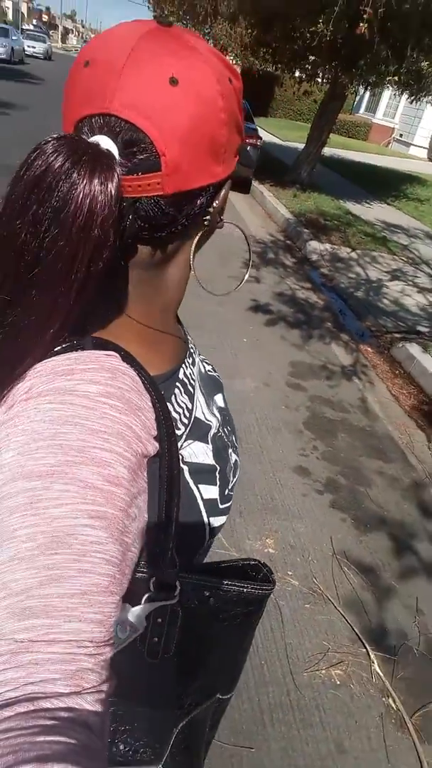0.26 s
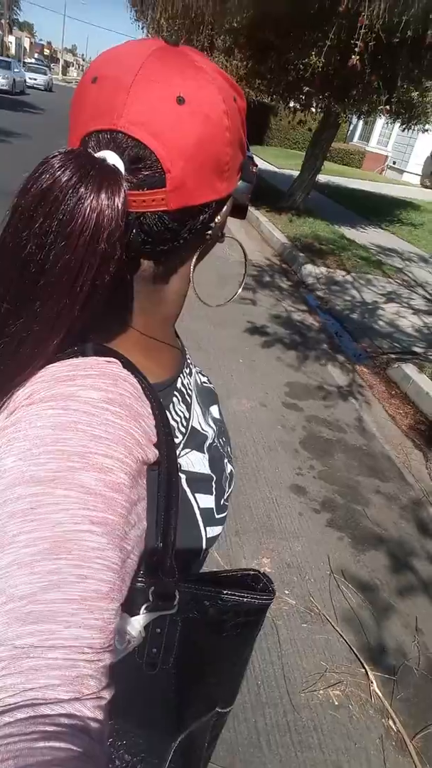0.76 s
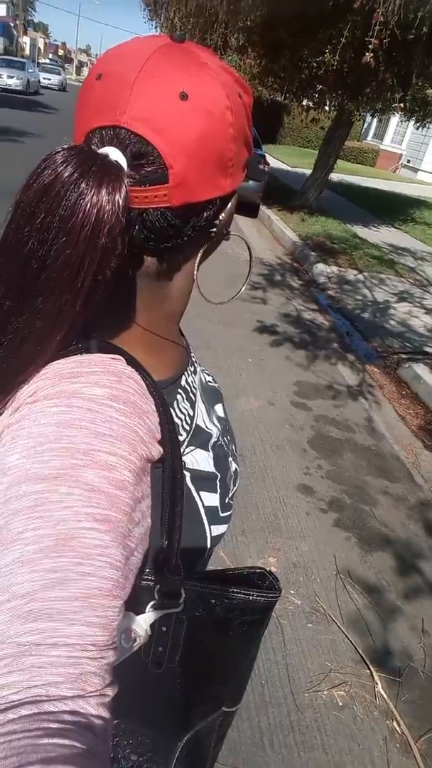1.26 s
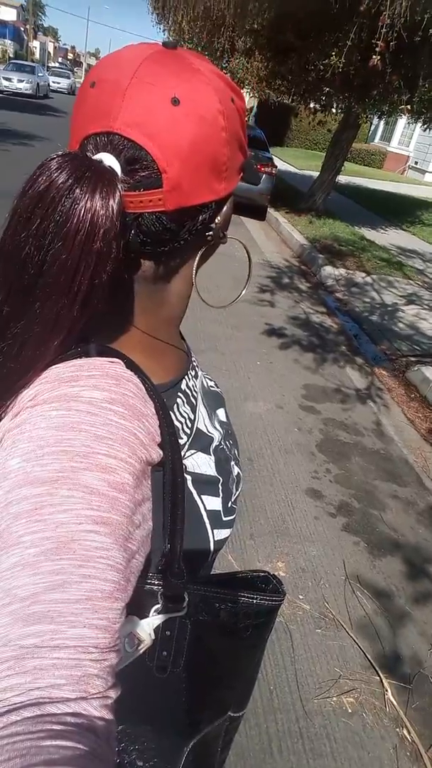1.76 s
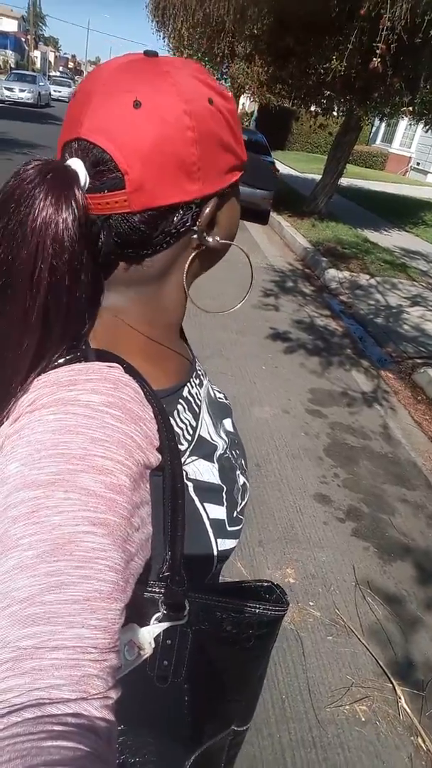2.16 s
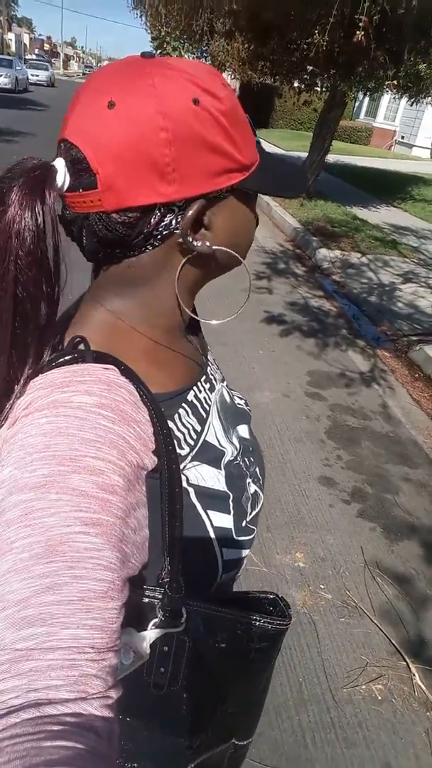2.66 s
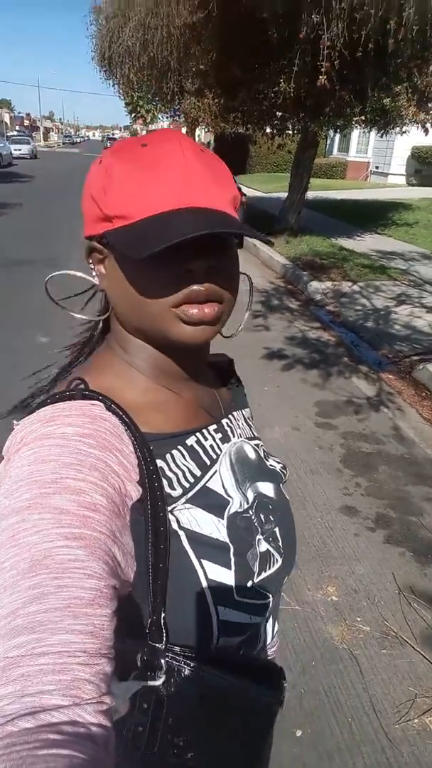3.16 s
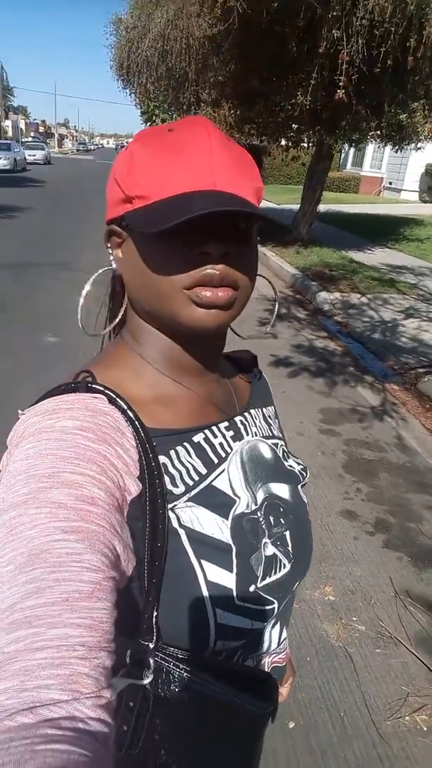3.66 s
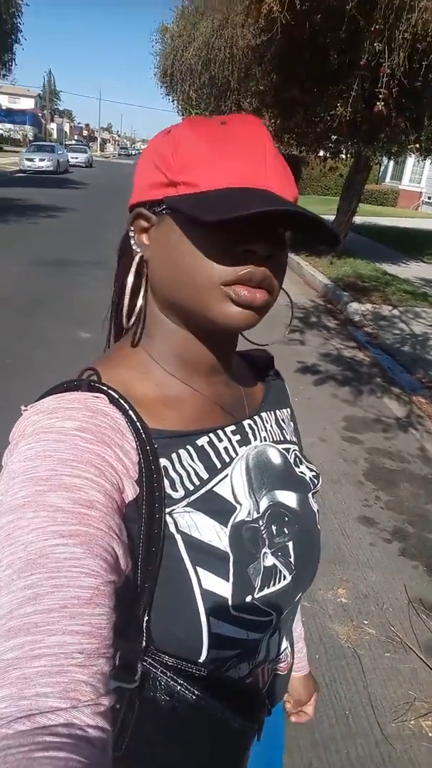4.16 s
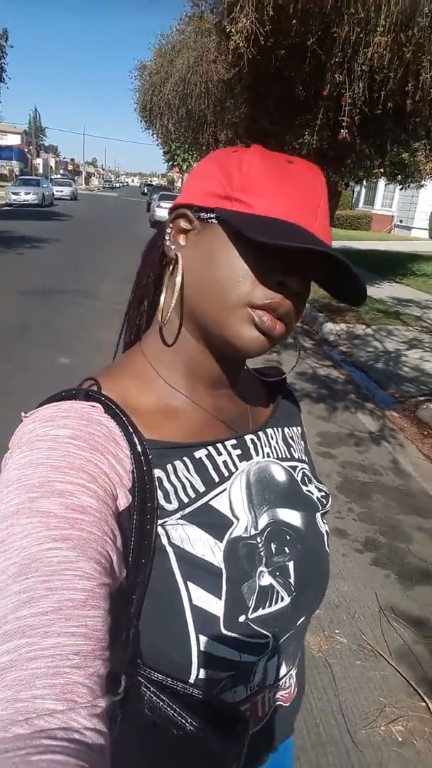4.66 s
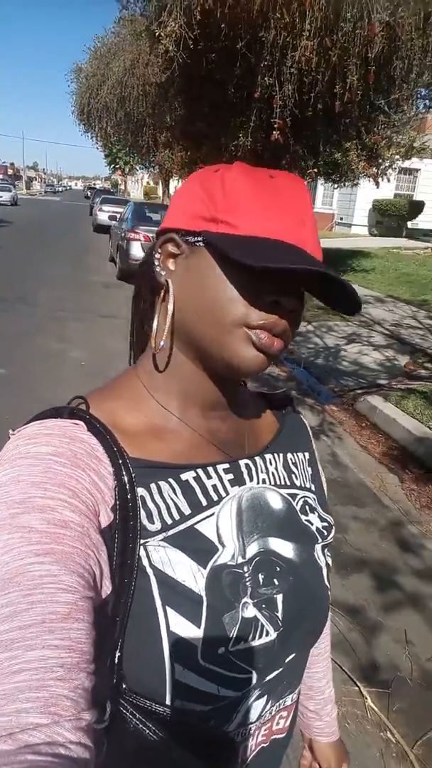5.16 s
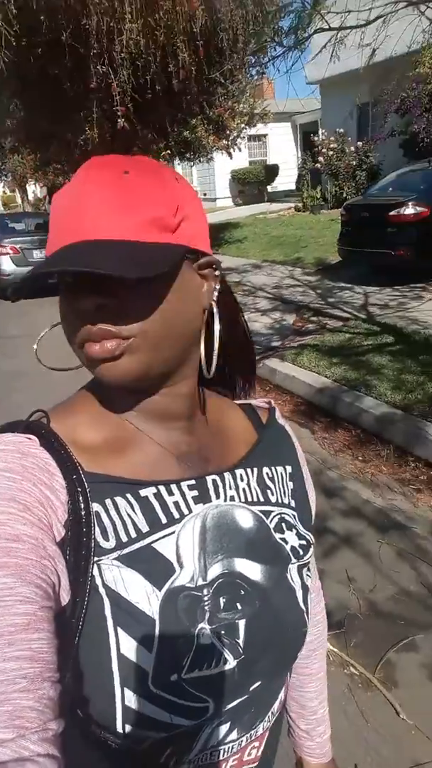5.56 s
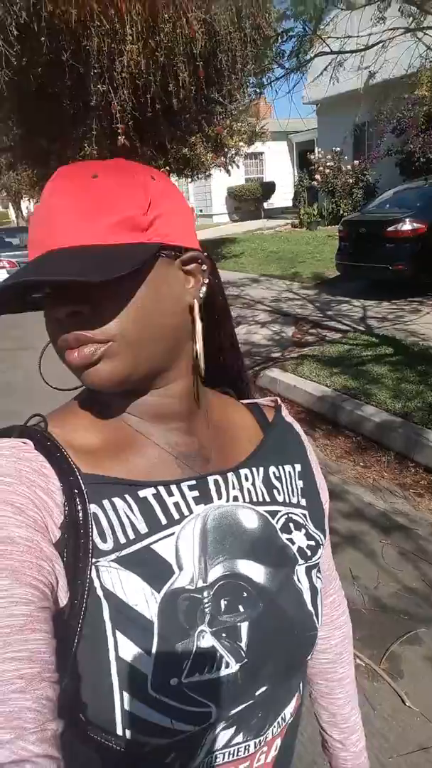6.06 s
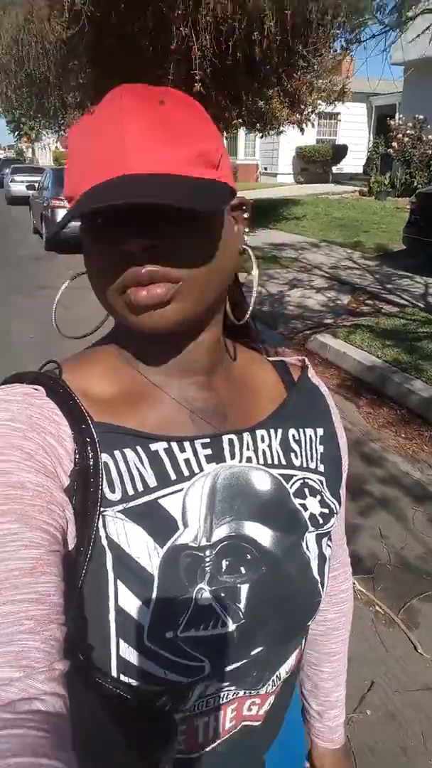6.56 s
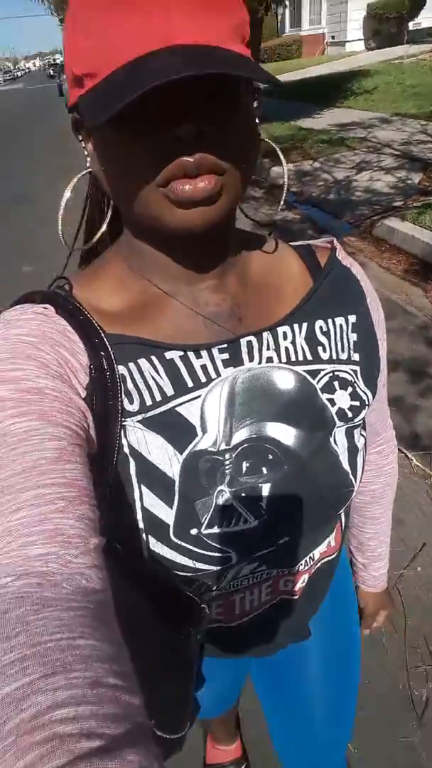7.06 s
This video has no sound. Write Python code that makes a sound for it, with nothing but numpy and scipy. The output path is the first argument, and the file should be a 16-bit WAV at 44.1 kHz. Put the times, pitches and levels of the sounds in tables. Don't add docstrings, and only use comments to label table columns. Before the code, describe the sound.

Sparrows whistle and buzz on a quiet street with faint distant sirens and traffic hum; a car door slams, then gritty footsteps and handling knocks.

```python
import sys
import numpy as np
from scipy import signal
from scipy.fft import rfft, irfft, next_fast_len
from scipy.io import wavfile
from scipy.ndimage import uniform_filter1d, map_coordinates

SR = 44100
rng = np.random.default_rng(int(sys.argv[2]) if len(sys.argv) > 2 else 0)


def gain_from_decibels(decibels):
    exponent = np.asarray(decibels, float) / 20
    return 10 ** exponent


def dump_mix(stems):
    frames = np.atleast_2d(stems).T
    limited = np.clip(frames, -1, 1)
    pcm = np.round(limited * 32767).astype(np.int16)
    wavfile.write(sys.argv[1], SR, pcm)


N = 322812

# time in seconds, level in dB.
HUM = [(0, -46), (3.5, -46), (4.8, -48), (5.4, -51), (6.9, -54.5), (7.32, -58)]
# time in seconds, depth in dB.
HUM_DIPS = [
    (.72, 2),
    (1.669, 6.1),
    (4.939, 9.5),
]
# time in seconds, level in dB.
TRAFFIC = [(0, -56.5), (.35, -56), (.98, -51), (1.88, -56), (2.2, -54.5), (3.55, -54), (4.7, -53),
           (5.26, -50), (5.69, -54), (5.87, -51.5), (6.26, -54.5), (6.74, -51.5), (7.32, -55)]
# frequency in Hz, density in dB per Hz.
RUMBLE = [(12, -51), (20, -27), (27, -34), (61, -11.5), (92, -10), (100, -5.5), (111, -8.5), (140, -12.5),
          (180, -23), (310, -120)]
DRONE = [(82, -39), (140, -16), (156, -7.5), (252, -12), (280, -17), (341, -16.5), (700, -32), (910, -46),
         (1540, -120)]
TYRES = [(290, -22), (500, -3.5), (918, -6), (1210, -7), (2140, -18), (2320, -16.5), (3000, -28.5),
         (3900, -74), (6600, -120)]
# frequency in Hz, density in dB per Hz.
CAR = [(190, -48), (270, -11), (330, 0.5), (450, -6), (750, -19), (1200, -120)]
# frequency in Hz, density in dB per Hz.
CHATTER = [(1800, -36.5), (2600, -11), (3500, -8), (4600, -13.5), (5400, -28.5), (6500, -36)]
# peak time in seconds, level in dB.
SWELLS = [(.22, -64), (2.59, -69.5), (3.44, -80), (5.1, -71), (6.22, -64.5), (6.9, -66)]
# frequency in Hz, density in dB per Hz.
HISS = [(3240, -32), (5500, 2.5), (7920, -2.5), (8680, -1), (11100, -3), (14900, -1), (15700, -3)]
# frequency in Hz, likeness from 0 to 1.
ALIKE = [(60, 0.93), (130, 0.98), (300, 0.88), (640, 0.83), (1400, 0.16), (3000, 0.022)]
# frequency in Hz, 60 dB decay time in seconds.
FRONTS = [(100, 0.39), (1000, 0.49), (3500, 0.44), (5000, 0.43), (10000, 0.2)]

# time at the top in seconds, top pitch in Hz, coasting time in seconds, level in dB.
WAIL = [
    (.23, 1733, 1.2, -0.6),
    (5.4, 1730, 1.65, -10),
]
# frequency in Hz, level in dB.
PATH = [(980, -78.5), (1080, -65.5), (1250, -64.5), (1370, -62), (1440, -55), (1530, -64.5), (1630, -67.5),
        (1720, -78)]
# start in seconds, length in seconds, from pitch in Hz, to pitch in Hz, level in dB.
MOAN = [
    (-.1, .55, 800, 830, -60),
    (.5, .24, 870, 850, -61),
    (.5, .24, 800, 790, -63),
    (.42, .3, 1260, 1350, -70),
    (5.033, .45, 924, 872, -64.5),
]

# seconds after start, pitch in Hz, level in dB, upper voice in dB.
TWO_HUMPS = [(.004, 2650, -28, -15), (.02, 4210, -7, 0.5), (.031, 4530, -5.5, -8.5),
             (.043, 4180, -4.5, -0.5), (.051, 2930, -14.5, -0.5), (.061, 3810, -4, -10),
             (.073, 4250, -3.5, -11), (.085, 3730, -7, -3.5), (.108, 2650, -23, -2)]
HUMP = [(0, 2610, -21, -20), (.012, 3327, -12.5, -4), (.0185, 4760, -2, -8.5), (.03, 4680, 1, -5.5),
        (.042, 4500, -2.5, 0.5), (.048, 3700, -2, -1), (.062, 3180, -2.5, -8), (.074, 2700, -22, -22)]
# seconds after the hook's start, pitch in Hz, level in dB.
HOOK = [(0, 2955, -3.5), (.012, 3696, 2.5), (.019, 3008, 0), (.035, 2650, -4), (.043, 2518, -51)]
# start in seconds, level in dB, pitch factor, time stretch.
HUMPS_AT = [(.133, -40, 1.02, 1), (1.279, -38.5, 0.98, 1.01), (2.538, -39, 1.022, 1.11),
            (3.924, -38.5, 0.97, 1.24), (5.045, -38, 1.0, 1.01), (6.949, -37, 0.99, 1.12)]
HOOK_AT = [(0.679, -47, 1.003, 0.98), (1.924, -46, 1, 1), (3.193, -45, 0.99, 0.98),
           (4.444, -45, 0.99, 1.015), (5.627, -44.5, 1.0, 1.0), (6.222, -43, 0.99, 1.0)]
FAR_AT = [(0, -64, .85, 1.2), (1.09, -69, 1.08, 1.5), (1.66, -64, 1.0, 1.1), (2.3, -64, 1.0, 1.4),
          (2.42, -62, 1.03, 1.1), (3.45, -64, .95, 1.1), (6.47, -63, .95, 1.1)]
# seconds after start, pulse rate in Hz, level in dB.
BUZZ = [(0, 560, -13), (.006, 670, 0.5), (.013, 735, 7.5), (.028, 706, 7), (.045, 680, 7.5),
        (.062, 665, -8)]
# multiple of the pulse rate, level in dB.
BUZZ_ORDERS = [(4, -28), (5, -2), (6, -4.5), (7, -20), (10, -36), (11, -31)]
# start in seconds, level in dB, pitch factor, time stretch.
BUZZ_AT = [(4.794, -61, 1.104, 1.06), (5.293, -56, 1.03, 0.98), (5.492, -55.5, 1.024, 1.06),
           (5.645, -53.5, 1.01, 0.98), (5.852, -55.5, 1.02, 1.24), (6.0, -53, 0.99, 1.1),
           (6.171, -52, 1.005, 1.19), (6.79, -74, 0.92, 1), (6.894, -57.5, 0.96, 0.95)]
# delay in seconds, level in dB.
ECHOES = [
    (.082, -17),
    (.172, -28),
]
# start in seconds, length in seconds, from pitch in Hz, to pitch in Hz, level in dB.
GLIDES = [(0.042, 0.046, 3780, 3370, -71), (.365, .06, 3780, 2800, -65), (1.069, 0.2, 3060, 4300, -79.5),
          (1.13, 0.09, 4970, 4880, -79), (2.408, 0.037, 2850, 2970, -67), (2.463, .05, 4760, 3970, -64),
          (3.118, .075, 3900, 4300, -70), (3.125, .07, 4100, 4500, -74), (6.793, 0.068, 3300, 3730, -71)]

# time in seconds, peak in dB, body in dB, left-right difference in dB.
TICKS = [(0.6762, -49, -3, 0), (1.6874, -69, 16, -10), (4.347, -58, -6, -2), (4.368, -38, -14, 1),
         (4.391, -44, -12, -2.5), (4.411, -39, -15, 3), (4.408, -46, -15, 0), (4.421, -45, -12, 0),
         (4.6125, -60, -10, 0), (2.846, -62, -30, 0), (5.851, -50, -6, -2), (6.155, -56, -20, 0),
         (7.0135, -34, -9, -3), (7.025, -36, -9, -3), (7.052, -34, -8, -3), (7.077, -34, -8, -3),
         (7.081, -36, -8, -3), (7.101, -40, -2, -4), (7.165, -46, -22, -4), (7.2405, -42, -26, -3),
         (4.5258, -33, -16, -10), (4.544, -47, -33, -5), (4.6157, -58, -4, -17), (4.7275, -60, 3, -9),
         (5.8407, -46, -4, -1), (6.621, -53, 3, 0), (7.011, -36, -9, -0.5), (7.040, -20, -14, -2),
         (7.0641, -30, -5, 6), (7.084, -40, -6, 0.5), (7.097, -43, 2, -6), (7.169, -39, -21, -3),
         (7.1784, -43, -16, -8), (7.1924, -34, -24, 2), (7.196, -35, -24, 3), (7.207, -27.5, -24, 5),
         (7.2222, -34, -17, -16), (7.2285, -30, -27, 2), (7.245, -32.5, -28, 3)]
# start, hardest moment and end in seconds, grit in dB, low scrape in dB.
SCUFF = [(2.273, 2.312, 2.364, -87.5, 30.5), (4.095, 4.134, 4.28, -75, -13),
         (4.343, 4.347, 4.43, -71, 18.5), (4.45, 4.52, 4.65, -78, 19), (5.758, 5.814, 5.87, -82.5, 32.5),
         (5.833, 5.84, 5.875, -71.5, 11), (6.696, 6.767, 6.86, -77.5, -15), (7.005, 7.042, 7.125, -53, 16),
         (7.148, 7.22, 7.275, -68, -4)]
# frequency in Hz, density in dB per Hz.
GRIT = [(590, -14), (1000, -17.5), (1330, -18), (1480, -15), (1710, -7), (2420, -10), (3450, -4.5),
        (5980, -15.5), (6870, -11.5), (7970, -25), (9250, -13.5), (13100, -31), (15500, -34)]

# time in seconds, peak in dB, thud in dB, steel in dB.
SLAM = [(3.601, -17, -14, -16), (3.608, -11, -14, -9), (3.6145, -5, -8, -2), (3.621, -1.5, -4, 0),
        (3.627, -7, -6, 0), (3.633, -9, -8, 0), (3.642, -7, -3, 0), (3.651, -12, -6, 0),
        (3.659, -18, -3, 0), (3.672, -24, 0, 0), (3.683, -24, 2, 0), (3.696, -22, 0.5, 0),
        (3.714, -24, -4, 0), (3.735, -30, -2, 0)]
# frequency in Hz, width in Hz, level in dB.
PANEL = [(865, 70, 1), (975, 60, 0), (1055, 50, 1), (1140, 60, 8), (1243, 55, 4), (1410, 220, 3),
         (1590, 100, 5), (1735, 110, 5), (1950, 300, -1), (2500, 700, -17)]
CABIN = [(69, 10, 4), (102, 16, 2), (125, 26, 1), (158, 30, 1), (205, 40, 0), (281, 45, 3), (400, 120, -1),
         (620, 200, -3)]
CRACK = [(2650, 520, 4), (3730, 800, 2), (6000, 3000, -7), (8400, 2500, -13), (10700, 1400, -22)]

# time in seconds, level in dB, left-right difference in dB.
SNAP = (7.1235, -14, -7)
# seconds after the knock, level in dB.
REBOUNDS = [
    (0, 1),
    (.00022, -2),
    (.0007, -13),
]
# frequency in Hz, width in Hz, level in dB.
CASE = [(250, 300, 8), (900, 400, 3), (1490, 400, 1), (2400, 500, 5), (3090, 450, 4), (3860, 800, 6),
        (5000, 1200, 3), (7080, 800, 4), (8520, 800, 5.5), (10500, 1500, -6), (12800, 900, -3),
        (14500, 2000, -1), (16100, 400, 5)]


def clock():
    return np.arange(N) / SR


def unit(x):
    return x / np.sqrt(np.mean(x ** 2) + 1e-20)


def along(points, hz):
    f, v = np.transpose(points)
    return np.interp(np.log(hz + 1), np.log(f + 1), v)


def curves(rows):
    s, *cols = np.transpose(rows)
    return [np.interp(clock(), s, c) for c in cols]


def wobble(rate):
    return map_coordinates(rng.standard_normal(int(N * rate / SR) + 4), [np.arange(N) * rate / SR])


def filtered(x, response):
    m = next_fast_len(N + SR // 2)
    return irfft(rfft(x, m) * response(np.fft.rfftfreq(m, 1 / SR)), m)[..., :N]


def modes(peaks):
    def response(f):
        total = 0
        for k, (centre, width, db) in enumerate(peaks):
            loss = 1j * f * width
            total = total + (-1) ** k * gain_from_decibels(db) * loss / (centre * centre - f * f + loss)
        return total
    return response


def ports(x, lag_s, pan_db):
    sides = np.array([[1], [-1]])
    pair = filtered(x, lambda hz: np.exp(-1j * np.pi * hz * lag_s * sides))
    return pair * gain_from_decibels(sides * pan_db / 2)


def paired(pair, gain):
    def turned(hz):
        angle = np.arccos(np.clip(along(ALIKE, hz), -1, 1)) / 2
        return gain(hz) * np.array([np.cos(angle), np.sin(angle)])
    mid, side = filtered(pair, turned)
    return np.array([mid + side, mid - side])


def rush(spectrum, patchy_db):
    z = signal.stft(rng.standard_normal((2, N + 512)), nperseg=512)[2]
    field = uniform_filter1d(rng.standard_normal(z.shape[1:]), size=6, axis=0)
    field = uniform_filter1d(field, size=14, axis=1)
    pair = signal.istft(z * gain_from_decibels(patchy_db * unit(field)), nperseg=512)[1][:, :N]
    return unit(paired(pair, lambda hz: gain_from_decibels(along(spectrum, hz))))


def fronts(x, gap_s, slow):
    hz, t, z = signal.stft(rng.standard_normal((2, SR)), SR, nperseg=256)
    decay = gain_from_decibels(-60 * t / (slow * along(FRONTS, hz)[:, None]))
    tail = signal.istft(z * decay, SR, nperseg=256)[1]
    tail = tail / np.linalg.norm(tail[0])
    late = np.pad(x, (int(gap_s * SR), 0))[None]
    return paired(signal.fftconvolve(late, tail, axes=1)[:, :N], np.ones_like)


def machine_hum():
    t, dip_s = clock(), 0.048
    hum_db = curves(HUM)[0] - sum(db * np.exp(-((t - s) / dip_s) ** 2) for s, db in HUM_DIPS)
    hum_hz = 128.3 - .62 * t + 0.72 * wobble(14)
    phase = 2 * np.pi * np.cumsum(hum_hz) / SR
    hum = gain_from_decibels(hum_db + 2.0 + 0.6 * wobble(18)) * (np.sin(phase) + gain_from_decibels(-18) * np.sin(2 * phase))
    return ports(hum, lag_s=1e-4, pan_db=0.45)


def traffic():
    effort_db, = curves(TRAFFIC)
    swing_db = effort_db - effort_db.mean()
    rumble = gain_from_decibels(-57.5 + 0.072 * swing_db + 1.1 * wobble(3.1)) * rush(RUMBLE, patchy_db=-1.0)
    drone = gain_from_decibels(effort_db + 2.0 + 1.7 * wobble(12)) * rush(DRONE, patchy_db=0.5)
    car_s, car_wide_s = 5.87, 0.6
    passing = gain_from_decibels(-54.5) / (1 + ((clock() - car_s) / car_wide_s) ** 2)
    car = passing * rush(CAR, patchy_db=-3.0)
    tyres = gain_from_decibels(-61.5 + 0.12 * swing_db + 0.4 * wobble(2.87)) * rush(TYRES, patchy_db=2.0)
    return (rumble + drone + car) * gain_from_decibels([[.45], [-.45]]) + tyres


def far_chatter():
    t, rest_db, swell_db_per_s = clock(), -75.5, 30.5
    swells_db = [np.maximum(db - swell_db_per_s * np.abs(t - s), rest_db) for s, db in SWELLS]
    return gain_from_decibels(np.max(swells_db, axis=0) + 1.5) * rush(CHATTER, patchy_db=2.5)


def hiss():
    return gain_from_decibels(-81.5) * rush(HISS, patchy_db=1.2)


def wailing_siren():
    t, idle_hz, spin_up_s, coast_bend = clock(), 825, 1.1, 1.4
    spins = []
    for s, top_hz, coast_s, _ in WAIL:
        climb = ((s - t) / spin_up_s) ** 2
        coast = (np.abs(t - s) / coast_s) ** coast_bend
        spins.append((top_hz - idle_hz) * np.exp(-np.where(t < s, climb, coast)))
    spins = np.array(spins)
    hz = idle_hz + spins.max(axis=0)
    turn_db = np.transpose(WAIL)[3][spins.argmax(axis=0)]
    climbing_db = -7 * (np.gradient(hz) > 0)
    return hz, along(PATH, hz) + turn_db + climbing_db


def sirens():
    t = clock()
    voices = [(*wailing_siren(), .006)]
    for s, length, from_hz, to_hz, db in MOAN:
        outside_s = np.maximum(np.maximum(s - t, t - s - length), 0)
        hz = np.interp(t, [s, s + length], [from_hz, to_hz])
        voices.append((hz, db - 130 * outside_s, .03))
    tone = 0
    for hz, db, unsteady in voices:
        phase = 2 * np.pi * np.cumsum(hz * (1 + unsteady * wobble(40))) / SR
        tone = tone + gain_from_decibels(db) * np.sin(phase)
    direct = ports(tone * gain_from_decibels(4.8 * wobble(14)), lag_s=1e-4, pan_db=-1.0)
    return gain_from_decibels(-2) * direct + gain_from_decibels(-3.0) * fronts(tone, gap_s=0.018, slow=1.8)


def sung(shape, calls):
    t, on = clock(), np.zeros(N)
    out = np.zeros((len(shape[0]) - 1, N)) + np.array(shape[0][1:])[:, None]
    s, *cols = np.transpose(shape)
    for start, db, pitch, stretch in calls:
        now = (t >= start) & (t < start + s[-1] * stretch)
        out[:, now] = [np.interp(t[now], start + s * stretch, c) for c in cols]
        out[0, now] *= pitch
        on[now] = gain_from_decibels(db)
    out, on = uniform_filter1d(out, size=130), uniform_filter1d(on, size=130)
    return 2 * np.pi * np.cumsum(out[0]) / SR, on * gain_from_decibels(out[1]), out[2:]


def perched(song, lag_s, pan_db):
    leaves = gain_from_decibels(-12) * fronts(song, gap_s=.005, slow=.1)
    walls = sum(gain_from_decibels(db) * np.roll(song, round(s * SR)) for s, db in ECHOES)
    houses = gain_from_decibels(-10) * fronts(song, gap_s=.02, slow=1.1)
    return ports(song, lag_s, pan_db) + leaves + houses + fronts(walls, gap_s=.001, slow=0.035)


def whistle(shape, calls):
    hoarse = []
    for row in shape:
        octave_db = -30 + 42 * np.exp(-(row[0] / .0125) ** 3)
        hoarse.append((*row, octave_db))
    phase, gain, (upper_db, over_db) = sung(hoarse, calls)
    phase = phase + .35 * wobble(400)
    octave = gain_from_decibels(over_db) * np.sin(2 * phase + 1.7 * wobble(500))
    air = gain_from_decibels(-39) * np.diff(rng.standard_normal(N + 1))
    upper_phase = phase + 2 * np.pi * 480 * clock() + .5 * wobble(300)
    upper = gain_from_decibels(upper_db + 3.15 * wobble(200)) * np.sin(upper_phase)
    return gain * gain_from_decibels(2.83 * wobble(250)) * (np.sin(phase) + octave + upper + air)


def buzzing():
    phase, gain, _ = sung(BUZZ, BUZZ_AT)
    phase = phase + .13 * wobble(350)
    stack = sum(gain_from_decibels(db + 3.4 * wobble(260)) * np.sin(round(k) * phase) for k, db in BUZZ_ORDERS)
    breath = gain_from_decibels(-31) * np.diff(rng.standard_normal(N + 1))
    return gain * (stack + breath)


def sparrows():
    hook_after_s, hook_upper_db = .085, -12
    hook = [(s + hook_after_s, hz, db, hook_upper_db) for s, hz, db in HOOK]
    out = fronts(whistle(TWO_HUMPS, FAR_AT), gap_s=0.0016, slow=0.85)
    for shape, calls in ((TWO_HUMPS, HUMPS_AT), (list(HUMP) + hook, HOOK_AT)):
        out = out + perched(whistle(shape, calls), lag_s=0.000082, pan_db=-4.0)
    return out + perched(buzzing(), lag_s=-0.000033, pan_db=0.5)


def glides():
    t, song = clock(), 0
    for s, length, from_hz, to_hz, db in GLIDES:
        u = np.clip((t - s) / length, 0, 1)
        swell = np.sqrt(np.abs(np.sin(np.pi * u))) * (u < 1)
        phase = 2 * np.pi * np.cumsum(from_hz + (to_hz - from_hz) * u) / SR
        song = song + gain_from_decibels(db) * swell * np.sin(phase)
    return perched(song * gain_from_decibels(2.5 * wobble(120)), lag_s=0.00002, pan_db=-5.0)


def ticks():
    layers = np.zeros((3, 2, N))
    burst = gain_from_decibels(-60 * np.arange(300) / SR / 0.0055)
    for (s, db, body_db, pan_db), noise in zip(TICKS, rng.standard_normal((len(TICKS), 300))):
        side = gain_from_decibels(db + np.array([[pan_db], [-pan_db]]) / 2) * burst * noise
        start = round(s * SR)
        layers[..., start:start + 300] += gain_from_decibels([[[body_db + 8.5]], [[6.5]], [[-14]]]) * side
    body, middle = modes([(1500, 1200, 0.09)]), modes([(3780, 1200, 0.11)])
    top = modes([(6680, 1300, 5.5), (9564, 2600, -18.0), (13540, 5400, -14)])
    return sum(filtered(x, lambda hz: ring(hz) ** 2) for x, ring in zip(layers, (body, middle, top)))


def feet():
    def colour(hz):
        return gain_from_decibels(along(GRIT, hz))

    def low(hz):
        return colour(hz) / (1 + (hz / 3000) ** 4)

    t, out = clock(), np.zeros((2, N))
    grains = rng.standard_normal((2, N)) * gain_from_decibels(4.2 * wobble(750) + 2 * wobble(60))
    grains[1] = .5 * grains[0] + 1.73 * grains[1]
    bright, dull = unit(filtered(grains, colour)), unit(filtered(grains, low))
    pan_db = np.array([[2], [-2]]) / 2
    for start, hardest, end, grit_db, low_db in SCUFF:
        away = np.interp(t, [start, hardest, end], [1, 0, 1])
        on = np.clip(np.minimum(t - start, end - t) / 0.0046, 0, 1)
        press = on * gain_from_decibels(grit_db + 9.5 - 24 * away ** 3 + pan_db)
        out += press * (bright + gain_from_decibels(low_db - 16.0) * dull)
    return out


def door():
    t, layers, blows = clock(), np.zeros((3, N)), np.zeros((2, N))
    fall_s = np.array([[.02], [.04], [.045]])
    for s, db, thud_db, steel_db in SLAM:
        crack_db = -29 + steel_db + 71 * (s - SLAM[0][0])
        fall = np.where(t >= s, gain_from_decibels(-60 * np.abs(t - s) / fall_s), 0)
        layers += fall * gain_from_decibels(db + np.array([[-1.5], [thud_db + 1.5], [crack_db + 2.5]]))
        blows[:, round(s * SR) + 45] = gain_from_decibels(db + np.array([13.5, thud_db + 21.5]))
    skin, body, edge = layers * rng.standard_normal((3, N)) * gain_from_decibels(3.5 * wobble(900))
    thud = filtered(body + blows[1], lambda hz: modes(CABIN)(hz) / (1 + 1j * hz / 2500))
    panel = filtered(skin + blows[0], lambda hz: modes(PANEL)(hz) / (1 + 1j * hz / 4000) ** 2)
    near = np.array([panel + filtered(edge, modes(CRACK)), thud])
    dull = signal.sosfilt(signal.butter(N=8, Wn=11300, fs=SR, output="sos"), near)
    top_returns = np.clip((t - SLAM[4][0]) / .02, 0, 1)
    clang, thud = dull + gain_from_decibels(-18) * (near - dull) * top_returns
    direct = ports(clang, lag_s=-0.000056, pan_db=-3.5) + ports(thud, lag_s=1e-4, pan_db=1.0)
    return direct + gain_from_decibels(-12.0) * fronts(clang + thud, gap_s=.03, slow=1.0)


def snap():
    s, db, pan_db = SNAP
    t = clock() - s
    blow = np.where(t >= 0, gain_from_decibels(-60 * np.abs(t) / 0.004), 0) * rng.standard_normal(N) * gain_from_decibels(-18)
    for k, (after, skip_db) in enumerate(REBOUNDS):
        blow[round((s + after) * SR)] += (-1) ** (k + 1) * gain_from_decibels(skip_db)
    return gain_from_decibels(db + np.array([[pan_db], [-pan_db]]) / 2) * filtered(blow, modes(CASE))


def scene():
    street = machine_hum() + traffic() + far_chatter() + hiss()
    birds = sparrows() + glides()
    return street + sirens() + birds + ticks() + feet() + door() + snap()


def roll_off(x):
    return signal.sosfilt(signal.butter(12, 17040, fs=SR, output="sos"), x)


def record(dry):
    fade_s, fade_db, top_hz = .05, -4, 15750
    faded = dry * gain_from_decibels(fade_db * np.clip(1 + (clock() - N / SR) / fade_s, 0, 1))
    limited = filtered(faded, lambda hz: gain_from_decibels(np.interp(hz, [top_hz - 300, top_hz + 300], [0, -13])))
    mix = limited - .0007
    return roll_off(mix)


dry = scene()
out = record(dry)
dump_mix(out)
```